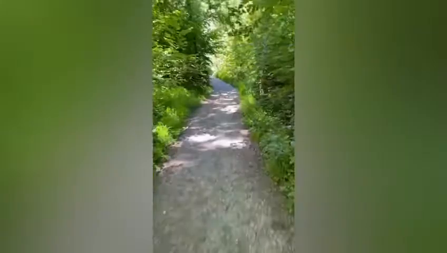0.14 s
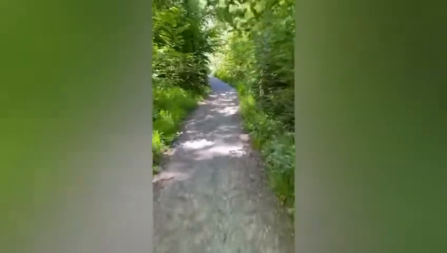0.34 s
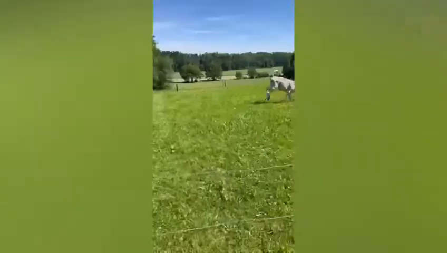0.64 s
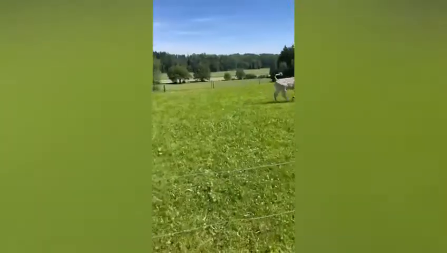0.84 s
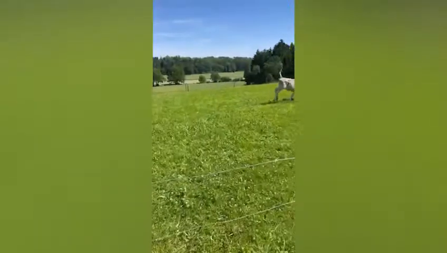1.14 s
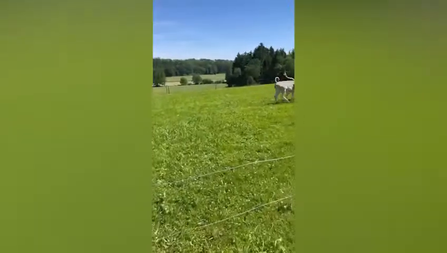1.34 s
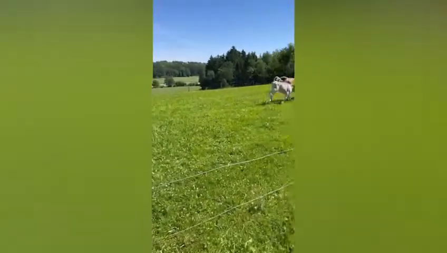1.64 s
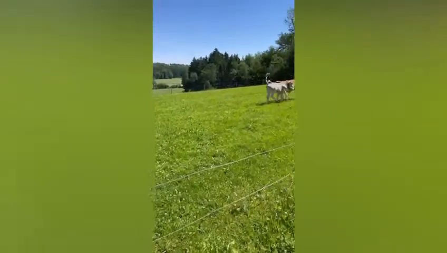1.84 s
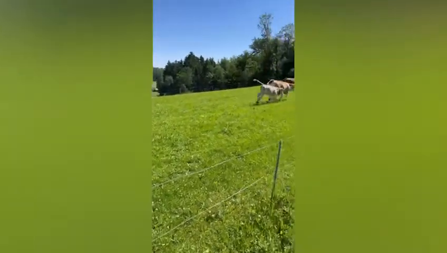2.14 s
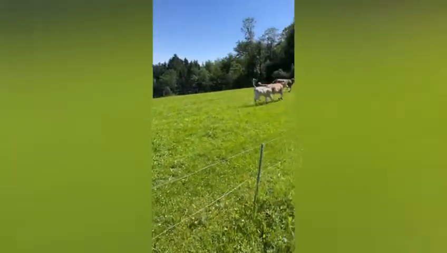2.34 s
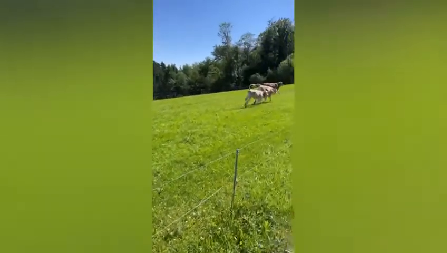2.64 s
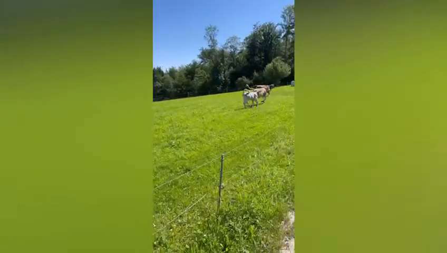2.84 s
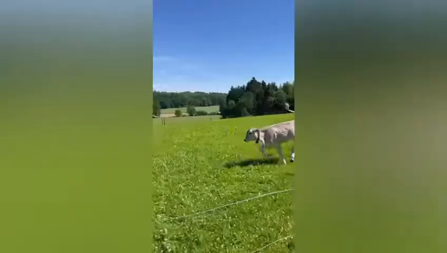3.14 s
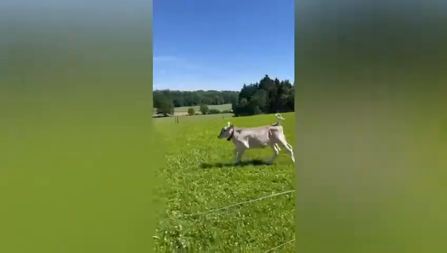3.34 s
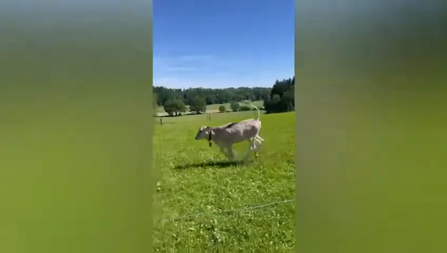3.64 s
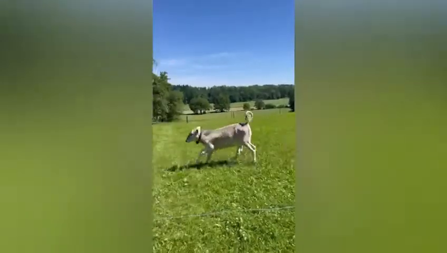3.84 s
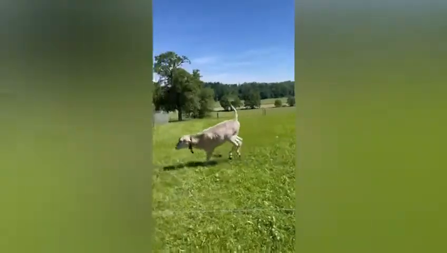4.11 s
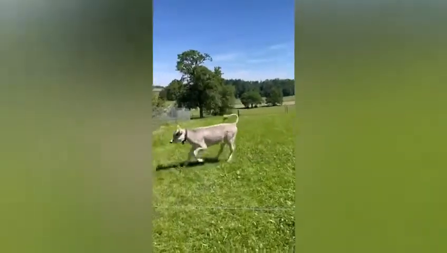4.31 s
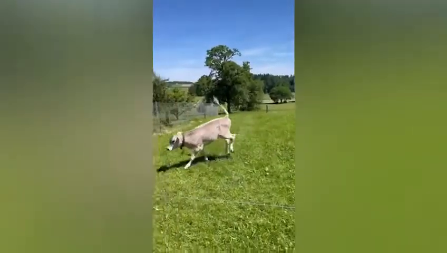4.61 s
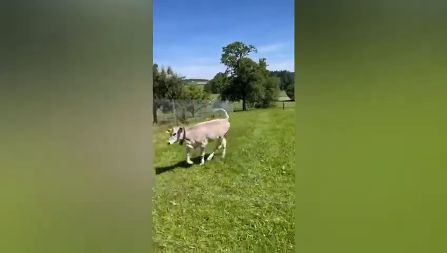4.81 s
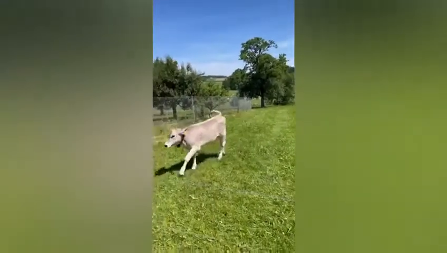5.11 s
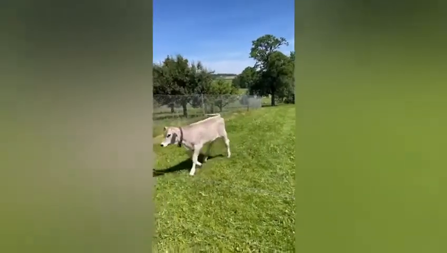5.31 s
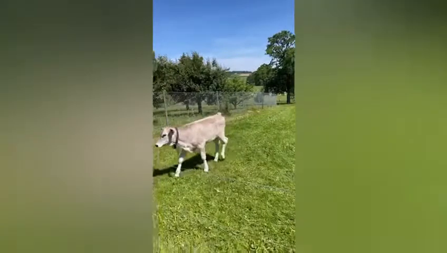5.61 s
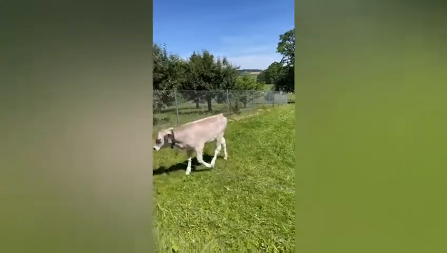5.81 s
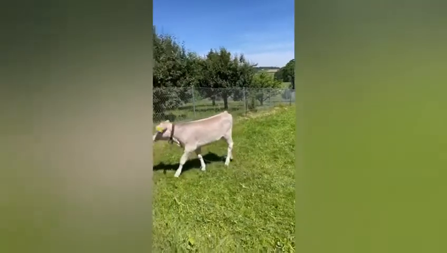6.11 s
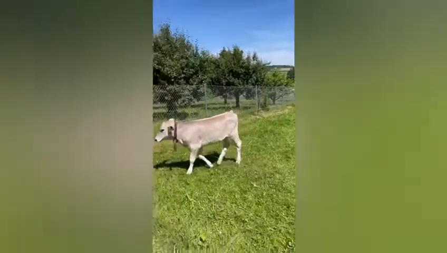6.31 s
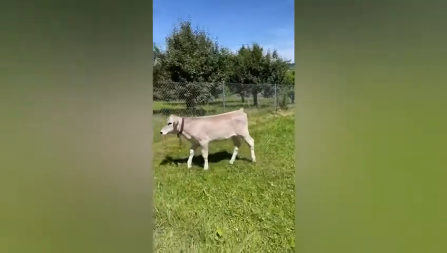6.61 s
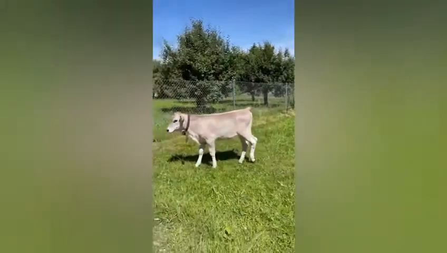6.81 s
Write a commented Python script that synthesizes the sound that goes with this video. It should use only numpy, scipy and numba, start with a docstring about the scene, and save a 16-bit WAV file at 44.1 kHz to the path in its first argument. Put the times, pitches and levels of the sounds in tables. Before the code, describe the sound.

A short rumble with clicking gravel gives way to a tinny cowbell rattling close by in a breezy pasture.

```python
"""A low rumble and clicking gravel on a forest path, then an abrupt change to an open pasture.
Close to the microphone a calf trots from right to left, a small sheet-metal bell on its collar.
The clapper bounces and chatters: each blow gives a short hollow note, singing shell tones and a jingle.
Far off an engine hums and small birds twitter; a breeze grows on the phone's microphone."""
import sys
import numpy as np
from scipy import signal
from scipy.fft import rfft, irfft
from scipy.io import wavfile
from scipy.ndimage import uniform_filter1d
from numba import njit

SR = 44100
rng = np.random.default_rng(int(sys.argv[2]) if len(sys.argv) > 2 else 0)


def store_wav(level_fs):
    """Save 16-bit WAV to argv[1]."""
    pcm = np.round(np.clip(np.atleast_2d(level_fs), -1, 1) * 32767)
    wavfile.write(sys.argv[1], SR, pcm.T.astype(np.int16))


N = 306936
TIME = np.arange(N) / SR
LEFT_RIGHT = np.array([[1], [-1]])


def undb(db):
    """Decibels to gain."""
    return 10 ** (np.asarray(db) / 20)


def unit(x):
    """Scale to rms 1."""
    return x / np.sqrt(np.mean(x ** 2))


def curve(rows, column=1):
    """One column of a table, joined by straight lines in time."""
    rows = np.array(rows)
    return np.interp(TIME, rows[:, 0], rows[:, column])


def over_hz(points):
    """A table of f/Hz and value, read at every spectral bin."""
    hz, value = np.transpose(points)
    return np.interp(np.log(np.fft.rfftfreq(N, 1 / SR) + 1), np.log(hz + 1), value)


def drift(rate):
    """Smooth random wander with a spread near 1."""
    hold = int(SR / rate)
    steps = np.repeat(rng.standard_normal(N // hold + 1), hold)
    return 1.3 * uniform_filter1d(uniform_filter1d(steps, hold), hold)[:N]


def band(x, lo_hz, hi_hz):
    """Gentle band-pass."""
    sos = signal.butter(2, [lo_hz, min(hi_hz, SR / 2 - 100)], "band", fs=SR, output="sos")
    return signal.sosfilt(sos, x + 1e-18)


def coloured(x, spectrum, share=1):
    """Shape a signal by a table of f/Hz and level/dB."""
    return irfft(rfft(x) * undb(over_hz(spectrum)) * share, N)


def air(spectrum, apart_hz):
    """Stereo noise, rms 1; the channels share the bass and part above apart_hz."""
    hz = np.fft.rfftfreq(N, 1 / SR)
    mid = coloured(rng.standard_normal(N), spectrum)
    side = coloured(rng.standard_normal(N), spectrum, share=hz / (hz + apart_hz))
    return unit(mid + side * LEFT_RIGHT)


def grains(rate, spread_db):
    """Random tiny impacts of uneven size, rms 1."""
    return unit((rng.random(N) < rate / SR) * rng.standard_normal(N) * undb(spread_db * rng.random(N)))


def bursts(rows, below, above):
    """One dying puff of noise a row, in a band round its centre frequency."""
    out, t = np.zeros(N + SR), TIME[:SR // 2]
    for start, db, hz, t60 in rows:
        puff = band(rng.standard_normal(len(t)) * undb(-60 * t / t60), hz / below, hz * above)
        i = int(start * SR)
        out[i:i + len(t)] += undb(db) * puff / np.abs(puff).max()
    return out[:N]


# rumble on the path: f/Hz, relative level/dB
PATH_RUMBLE = [(18, -27), (59, 1.5), (97, -13), (128, -0.5), (192, 2.5), (550, -17.5), (1110, -32),
               (1830, -26.5), (4080, -31.5), (4870, -43), (6100, -35.5), (7500, -38), (9000, -79),
               (11000, -31.5), (13000, -64)]
def forest_path():
    """A low rolling rumble and the crackle of fine grit."""
    rumble = undb(-36) * air(PATH_RUMBLE, apart_hz=1380) * undb(2.1 * drift(22.1))
    grit = band(grains(rate=260, spread_db=14), 1100, 3500)
    return rumble + undb(-39) * grit


# gravel near the microphone: t/s, peak level/dB, centre f/Hz, t60/s
STONES = [(.038, -35, 2430, .025), (.089, -33, 2200, 0.019), (.159, -35, 2670, 0.037),
          (.198, -37, 8700, 0.016), (.198, -31.5, 6430, .014), (.21, -25.5, 523, 0.088),
          (.222, -36, 1700, .06), (.331, -35, 3000, .015), (.363, -37, 1900, .015), (.424, -29, 2010, 0.02),
          (.435, -36, 2700, 0.051), (.455, -39, 2600, 0.035), (.525, -26.5, 630, 0.14),
          (.525, -27.5, 1890, 0.037)]
def stones():
    """Stones click as they are knocked on the path."""
    return bursts(STONES, below=1.33, above=1.22)


# open air over the pasture: f/Hz, relative level/dB
FIELD_AIR = [(100, 6), (300, -1.5), (400, -6.5), (700, -2.5), (1100, -7), (1800, -17), (2700, -39),
             (4000, -22), (6000, -36.5), (12000, -102)]
def pasture_hush():
    """A soft hush, a little stronger on the left."""
    level_db = curve([(.6, -49.5), (2.9, -51), (3.3, -49.5), (6.9, -44.5)]) + 0.92 * drift(3.3)
    return undb(level_db + LEFT_RIGHT) * air(FIELD_AIR, apart_hz=430)


# wind right on the microphone: t/s, level/dB
BREEZE = [(.55, -47), (2.1, -43.5), (2.95, -47.5), (3.35, -39), (4.8, -38.5), (5.6, -45), (6.05, -37.5),
          (6.4, -36.5), (6.66, -30.5), (6.76, -29.5), (6.95, -31.5)]
# its rumble: f/Hz, relative level/dB
WIND_RUMBLE = [(12, -57.5), (20, -40.5), (53, 1), (75, 1.5), (151, -7.5), (185, -13), (248, -20),
               (372, -37.5), (500, -27.5), (650, -82.5), (1100, -120)]
def breeze():
    """Moving air rumbles unevenly on the microphone."""
    return undb(curve(BREEZE) + 2 * drift(12)) * air(WIND_RUMBLE, apart_hz=1150)


# engine in the distance: t/s, firing f/Hz, level/dB
ENGINE = [(.55, 86, -64), (1.7, 86, -57), (2.05, 86, -52), (2.7, 86.5, -51), (3.1, 86, -54),
          (3.25, 86, -72)]
def far_engine():
    """Three firing harmonics, their phases jumbled by the long path through moving air."""
    phase = 2 * np.pi * np.cumsum(curve(ENGINE) * (1 + 0.0061 * drift(7.4))) / SR
    firing = sum(undb(db + 2 * drift(6.57)) * np.sin(harmonic * phase + 0.91 * drift(8.5))
                 for harmonic, db in enumerate([0, -2, -2], start=1))
    return undb(curve(ENGINE, column=2)) * firing


def taps(times, db):
    """A force of single impulses, one a blow."""
    return np.bincount(np.clip(np.round(times * SR).astype(int), 0, N - 1), undb(db), N)


def last_blow(times):
    """Index of the latest blow at every sample."""
    return np.maximum(np.searchsorted(times, TIME, "right") - 1, 0)


def bounces(times, db, t60):
    """After a blow the clapper bounces many times on the wall, ever more softly."""
    fade = signal.lfilter([1], [1, -undb(-60 / (t60 * SR))], taps(times, db) + 1e-18)
    return uniform_filter1d(fade, size=160) * grains(rate=2500, spread_db=9.9)


@njit
def mode(force, hz, t60, pitch):
    """One damped resonance whose frequency follows the pitch factor."""
    out, z, pole = np.empty(len(force)), 0j, 0j
    for i in range(len(force)):
        if i % 256 == 0:
            pole = np.exp((2j * np.pi * hz * pitch[i] - np.log(1000) / t60) / SR)
        z = z * pole + force[i] + 1e-18
        out[i] = z.imag
    return out


# the clapper rolls round the rim: t/s, length/s, low jingle drive/dB, top jingle drive/dB
RIM_ROLLS = [(0.747, 0.034, -19.5, -24), (0.903, 0.12, -31, -34), (1.557, 0.048, -27, -38),
             (2.04, 0.085, -27, -30.5), (2.502, 0.13, -29, -32.5), (3.24, 0.27, -29, -35.5),
             (3.692, 0.041, -22, -31), (3.808, 0.13, -35.5, -34.5), (4.416, 0.025, -17.5, -30),
             (4.47, 0.032, -39, -38), (5.063, 0.15, -29, -28)]
def chatter(column, trot_end_s=4.9, trot_db=-44.5, walk_db=-60.5, attack_s=0.029, release_db_per_s=234):
    """The loose clapper ticks, more at a trot than at a walk, and at times rolls round the rim."""
    level = undb(np.interp(TIME, [trot_end_s, trot_end_s + 0.023], [trot_db, walk_db]))
    for roll in RIM_ROLLS:
        start, length = roll[:2]
        attack = np.clip((TIME - start) / attack_s, 0, 1)
        level += attack * undb(roll[column] - release_db_per_s * np.clip(TIME - start - length, 0, 1))
    return level * undb(4.5 * drift(30)) * grains(rate=740, spread_db=1.5)


# modes of the hollow note; opposite signs make it swell for a few ms: f/Hz, level/dB, t60/s, weight
HOLLOW_MODES = [(1231.7, 4.5, 0.11, 0.82), (1269, 6.5, 0.021, -0.8), (1234.5, -15, 0.12, 0.95),
                (1020, -28.5, 0.46, 0.45)]
def hollow_note(times, db, rattle, pitch):
    """The bell's strongly damped main note, roughened by the bouncing clapper."""
    force = taps(times, db) + undb(-37.5) * rattle + undb(-36) * bounces(times, db, t60=.12)
    return sum(weight * undb(gain) * mode(force, float(hz), t60, pitch)
               for hz, gain, t60, weight in HOLLOW_MODES)


# hum, ring and upper ring of the shell: f/Hz, t60/s, rise/s, beat/Hz, beat depth 0-1
SHELL_TONES = [(2348, 1.3, .02, 3, .12), (3162, .7, .005, 17, .07), (4572, .4, .003, 9, .12)]
# upper ring against a blend of ring and jingle: t/s, level/dB
UPPER_RING = [(.65, -11), (.9, -6), (1.2, -13), (2.05, -19.5), (2.6, -6), (3.15, -11), (4.2, -16.5),
              (4.48, 3), (4.98, -6.5), (5.1, -3.5), (6.0, -0.5), (6.35, -3), (6.8, -12)]
def shell_tones(times, force_db, hum_db, ring_db, jingle_db, pitch, brake_t60=0.024, full_jolt_db=-21.5):
    """Long singing tones; each contact jolts their phase and pitch, and feeds or brakes them."""
    upper_db = np.interp(times, *np.transpose(UPPER_RING)) + 0.68 * ring_db + 0.32 * jingle_db
    hardness = np.minimum(undb(force_db - full_jolt_db), 1)
    last = last_blow(times)
    age = np.abs(TIME - times[last])
    brake_db = 60 * TIME / brake_t60  # the fastest a tone can fall
    out = 0
    for (hz, t60, rise, beat_hz, depth), db in zip(SHELL_TONES, (hum_db, ring_db, upper_db)):
        swing_db = np.maximum.accumulate(db[last] - 60 * age / t60 + brake_db) - brake_db
        swing = uniform_filter1d(undb(swing_db), size=int(rise * SR))
        jolt, detune = rng.standard_normal((len(times), 2)).T
        # the bell swings on its strap, so pitch and loudness waver
        tuning = 1 + 0.00139 * detune[last] + 0.001197 * drift(25)
        phase = 2 * np.pi * np.cumsum(hz * pitch * tuning) / SR
        phase += 1.46 * uniform_filter1d(np.cumsum(jolt * hardness)[last], size=400)
        rough = undb(-15) * (drift(90) * np.sin(phase) + drift(90) * np.cos(phase))
        tone = np.sin(phase) + depth * np.sin(phase - 2 * np.pi * beat_hz * TIME) + rough
        sway_db = 1.3 * drift(30) + 1.4 * drift(11)
        out += swing * undb(sway_db) * tone
    return out


def struck_modes(modes, times, db, rattle, pitch, spot_spread_db=3, waver=0.0033):
    """The clapper lands on another spot each time, so mode strengths vary; their pitches waver."""
    total = np.sqrt(sum(undb(gain) ** 2 for _, gain, _ in modes))
    out = 0
    for hz, gain, t60 in modes:
        force = taps(times, db + spot_spread_db * rng.standard_normal(len(times)))
        force += rattle * undb(5.6 * drift(12))
        out += undb(gain) / total * mode(force, float(hz), t60, pitch * (1 + waver * drift(45)))
    return out


# short-lived modes close to the ring: f/Hz, relative level/dB, t60/s
CLANK_MODES = [(3062, 0, .075), (3015, -9, .05), (3250, -14, .04)]
def clank(times, db, rattle, pitch):
    """A short clank, fed by blows, bounces and chatter."""
    contacts = undb(-30.5) * bounces(times, db, t60=0.044) + undb(-43) * rattle
    return band(struck_modes(CLANK_MODES, times, db - 12.5, contacts, pitch), 3070, 3190)


# high shell modes, lower and top group: f/Hz, relative level/dB, t60/s
LOW_JINGLE = [(4941, -11, .85), (5110, -15, .15), (5330, -18, .1), (5673, -18, .2), (5900, -17, .06),
              (6260, -16, .08), (6430, -14, .07), (6632, -4, .2), (6815, 0, .18), (6922, 1.5, .15),
              (7407, -15, .15), (7780, -16, .07), (8139, -3, .17), (8387, -3, .11), (8677, -7, .12)]
TOP_JINGLE = [(9517, -6, .1), (9819, -4, .11), (9926, -3, .11), (10190, 0, .11), (10430, 0, .14),
              (10798, 5, .2), (10870, 0, .15), (11345, 2, .3), (11584, 1, .16)]
def jingle(times, low_db, top_db, low_contacts, top_contacts, pitch):
    """The thin shell rings brightly under blows and small contacts."""
    low = struck_modes(LOW_JINGLE, times, low_db - 8.5, low_contacts, pitch)
    top = struck_modes(TOP_JINGLE, times, top_db - 9, top_contacts, pitch)
    return band(low, 5850, 14200) + band(top, 9800, 10640)


# metal landing on metal: f/Hz, relative level/dB
SNAP_COLOUR = [(900, -8.5), (1700, -4), (2700, 5), (4000, -5.5), (5600, -4.5), (7000, 0.5), (7800, -13),
               (9200, 5), (10500, 9), (12000, 2.5)]
# bands whose strength differs from blow to blow: low f/Hz, high f/Hz
SNAP_BANDS = [(700, 2500), (2500, 4800), (4800, 7500), (7500, 12500)]
def snap(times, db, rise_s=0.0014, spread_db=3.5):
    """A dry crack as the clapper lands, then a stuttering tinny clatter."""
    fade = 0
    for gain_db, t60 in ((18.5, .022), (17, .08)):  # crack, clatter
        decay = undb(-60 / (t60 * SR))
        fade += signal.lfilter([np.sqrt(1 - decay ** 2)], [1, -decay], taps(times, db + gain_db) + 1e-18)
    rise = np.exp(-1 / (rise_s * SR))
    envelope = signal.lfilter([1 - rise], [1, -rise], fade)
    noise = coloured(rng.standard_normal(N), SNAP_COLOUR)
    band_gains = undb(spread_db * rng.standard_normal((len(times), len(SNAP_BANDS)))).T
    last = last_blow(times)
    crack = sum(band(noise, lo, hi) * gain[last] for (lo, hi), gain in zip(SNAP_BANDS, band_gains))
    stutter = undb(3 * drift(140))
    return envelope * stutter * crack


# colour of the bell's dense weak modes: f/Hz, relative level/dB
SHIMMER = [(1000, -20), (1800, -15), (2700, -13), (3700, -37), (4700, 3), (5400, -18), (6300, -28),
           (7700, -42), (8300, 10), (9100, -24), (9900, 15.5), (11500, 4.5), (12300, -25)]
def shimmer(force, t60=0.14, rise_s=0.004, count=52):
    """Many weak modes, unevenly spaced, turn every tick into a short metallic tinkle."""
    t = TIME[:SR // 3]
    place, size, start = rng.random((count, 3)).T[:, :, None]
    hz = 1400 + 10600 * (np.arange(count)[:, None] + place) / count
    tones = np.sum((.5 + size) * np.sin(2 * np.pi * (hz * t + start)), axis=0)
    tail = tones * undb(-60 * t / t60) * (1 - np.exp(-t / rise_s))
    wash = signal.fftconvolve(force, tail / np.sqrt(2 * np.sum(tail ** 2)))[:N]
    return coloured(wash, SHIMMER)


def scatter(x, t60):
    """Diffuse echo from grass and trees, different in each channel."""
    t = TIME[:SR]
    tail = rng.standard_normal((2, SR)) * undb(-60 * t / t60) * (1 - np.exp(-t / 0.00098))
    return signal.fftconvolve(x[None], tail / np.sqrt(np.sum(tail[0] ** 2)), axes=1)[:, :N]


# phase between the microphone ports: f/Hz, lead of the left port/rad
PORT_PHASE = [(100, 0), (1200, -.2), (2350, .45), (3165, .7), (4575, 1.8), (4940, 3.9), (5500, 6.1),
              (6900, 7.3), (8300, 9), (10250, 10.35), (10800, 10.9), (11400, 12.2), (12000, 12.5)]
def at_microphone(bell):
    """The bell reaches the two ports slightly out of step, with a faint echo from the pasture."""
    left_db = over_hz([(1200, 0.046), (2350, 0.48), (3150, -0.87), (4570, -1.1), (6500, -0.006)])
    left = np.exp(.5j * over_hz(PORT_PHASE)) * undb(left_db)
    direct = irfft(rfft(bell) * np.array([left, 1 / left]), N)
    return direct + undb(-15.5) * scatter(bell.mean(axis=0), t60=0.31)


# clapper blows; the spot struck decides how hard each voice is driven:
# t/s, hollow note/dB, hum/dB, ring/dB, low jingle/dB, top jingle/dB, snap/dB
BLOWS = [(0.582, -44, -66, -61, -39, -25, -28.5), (0.615, -11, -49, -35.5, -31, -26.5, -32),
         (0.643, -22, -46.5, -30.5, -28, -27, -44), (0.733, -12.5, -55, -28.5, -16.5, -17, -29),
         (0.763, -26.5, -34.5, -45, -17, -10.5, -40), (0.823, -42, -37.5, -48, -33, -23, -55),
         (0.908, -28, -37, -32, -18.5, -10.5, -26), (0.939, -31.5, -36, -36.5, -23, -30, -53),
         (1.03, -36, -40, -44.5, -23, -25.5, -70.0), (1.101, -56, -42, -51, -26.5, -23, -48),
         (1.178, -45.5, -52, -61, -23.5, -15.5, -23), (1.196, -13, -42, -40.5, -42, -50, -65),
         (1.222, -22.5, -47, -39.5, -47.0, -25.5, -68), (1.284, -31.5, -53, -44, -34, -31, -70),
         (1.407, -23, -40.5, -26.5, -29, -16, -36.5), (1.551, -43, -66, -49, -25.5, -22, -41),
         (1.61, -18, -53, -36.5, -27.5, -22, -36), (1.661, -31.5, -71, -37.5, -37, -26, -50),
         (1.759, -38.5, -62, -49, -49, -46, -54), (1.816, -34, -58, -53, -40.5, -46, -58),
         (1.853, -35.5, -47.5, -43, -22.5, -17.5, -38), (1.973, -20.5, -55.5, -56, -35, -25.5, -43),
         (2.02, -20, -62, -20, -23, -18, -36), (2.079, -42.5, -57.0, -34.5, -20, -41, -51),
         (2.133, -12.5, -31.5, -27.5, -27, -15, -47), (2.201, -27.5, -65, -25, -36.5, -53, -51),
         (2.346, -20.5, -66, -41, -32.0, -43, -32.5), (2.377, -33, -63, -32.5, -27.5, -18.5, -43),
         (2.453, -27.0, -55, -38.5, -35.5, -34, -45), (2.536, -24, -49, -49, -30, -32.5, -47),
         (2.61, -22, -45.5, -34.5, -40, -38, -70.0), (2.823, -27.5, -57, -38.5, -68, -35, -43.5),
         (2.902, -36.5, -69, -49, -47.5, -40, -55), (3.067, -38, -62, -52, -42, -27, -46),
         (3.121, -23.5, -54, -20, -23, -16, -32), (3.152, -36, -54, -34.5, -51, -47, -66),
         (3.2, -29.5, -66.0, -36.5, -32, -29, -48), (3.241, -26, -48.5, -45.5, -19, -21, -28),
         (3.367, -35, -42.5, -34, -27, -21, -42), (3.404, -28, -43, -48, -31, -15.5, -45),
         (3.466, -10, -30.5, -38, -35, -18, -22.5), (3.497, -24.5, -42, -31, -52, -40, -72),
         (3.582, -32, -39, -49.0, -38, -24, -71), (3.707, -24.5, -34.5, -49, -30, -28, -42),
         (3.758, -64, -34, -49, -25, -14.5, -37), (3.875, -38, -42, -51, -45, -39, -52),
         (3.944, -33, -45, -59, -30, -19, -42), (4.01, -11.5, -41, -33, -30, -18, -31),
         (4.06, -8.5, -43, -34.5, -35, -22.5, -45), (4.141, -16, -34.5, -33.5, -42, -27, -37),
         (4.236, -20.5, -34.5, -42, -33, -25, -38), (4.357, -29, -57, -42, -22, -15, -27),
         (4.383, -33.5, -51, -45, -34, -33, -50), (4.432, -43, -62, -63, -27, -29, -48),
         (4.471, -17.5, -47, -30, -33, -15, -37), (4.581, -21.5, -44, -31, -28, -20, -40),
         (4.855, -8.5, -35.5, -35, -25, -16.5, -27.5), (4.953, -37, -53, -48, -21, -17, -44),
         (4.969, -19, -51, -28.5, -21.5, -13.5, -42), (5.035, -26, -48.5, -42, -15, -10.5, -28),
         (5.121, -23, -38, -40, -39, -28, -40), (5.179, -26, -45.5, -49, -37, -30, -70.0),
         (5.284, -40, -60, -48.5, -50, -34, -65), (5.363, -34.5, -95.5, -60.5, -60, -51.0, -63),
         (5.473, -34.5, -99.0, -53, -66, -63, -80), (5.57, -21.5, -73, -38, -60, -44, -42),
         (5.605, -44, -70, -53.5, -47.5, -48, -47), (5.917, -49, -86, -75, -56, -53, -37),
         (5.977, -22, -44.5, -34.5, -37, -31, -25), (6.02, -25, -73, -44, -42, -40, -56),
         (6.053, -31, -60, -54.5, -36.5, -34, -61), (6.343, -18, -46.5, -33.5, -32.5, -30, -49),
         (6.441, -17, -46.5, -41.5, -39, -27.5, -31), (6.492, -32, -56, -60, -46, -47, -60),
         (6.539, -29, -48, -47.5, -33.5, -24, -42), (6.721, -14.5, -61, -29, -19.5, -11.5, -30),
         (6.781, -16, -46.0, -33, -32, -17, -44.0), (6.826, -23, -62, -37, -31.5, -38, -70.0),
         (6.859, -27.5, -52, -43, -42, -36, -56), (6.894, -31, -57, -50, -42.5, -54, -70.0)]
# the calf first runs away from the microphone, then comes closer: t/s, pitch factor
DOPPLER = [(0, .9925), (3.0, .9925), (3.2, .999), (6.9, 1.0005)]
# it crosses from right to left: t/s, left minus right level of the bell's lower voices/dB
CROSSING = [(.6, -1.5), (1.8, -0.5), (2.6, -0.8), (3.4, 1), (4.2, 2), (5.2, 1), (6.4, 3.5)]
def cowbell():
    """The collar bell, close by: one clapper drives all the voices of the sheet-metal shell."""
    times, hollow_db, hum_db, ring_db, low_db, top_db, snap_db = np.transpose(sorted(BLOWS))
    pitch = curve(DOPPLER)
    low_rattle, rattle = chatter(column=2), chatter(column=3)
    low_buzz, top_buzz = bounces(times, low_db, t60=0.03), bounces(times, top_db, t60=0.02)
    low_contacts = undb(-39) * low_rattle + undb(-24) * low_buzz
    top_contacts = undb(-39) * rattle + undb(-27) * top_buzz
    ticks = taps(times, snap_db - 1) + undb(-9.5) * rattle
    ticks += undb(-0.5) * top_buzz + undb(-10.5) * low_buzz
    body = hollow_note(times, hollow_db, rattle, pitch)
    body += undb(-1.5) * shell_tones(times, hollow_db, hum_db, ring_db, (low_db + top_db) / 2, pitch)
    treble = clank(times, (hollow_db + ring_db) / 2, rattle, pitch)
    treble += jingle(times, low_db, top_db, low_contacts, top_contacts, pitch)
    treble += snap(times, snap_db) + shimmer(ticks)
    pan = undb(curve(CROSSING) * LEFT_RIGHT / 2)
    return at_microphone(band(body * pan + treble, 690, 10900))  # so small a bell radiates no bass


# birds off in the wood: t/s, length/s, first f/Hz, last f/Hz, relative level/dB, trill depth/share of f
SYLLABLES = [(1.12, .018, 3580, 4400, -43, 0), (1.156, .018, 4700, 4030, -40, 0),
             (1.161, 0.021, 3950, 4400, -48, 0.016), (1.188, 0.04, 3290, 4550, -43, 0.02),
             (1.207, 0.016, 4330, 3300, -40.5, 0.009), (1.267, 0.092, 3990, 3760, -39.5, 0.1),
             (1.384, 0.028, 3200, 4120, -44, 0.049), (2.53, 0.054, 3800, 3550, -41.5, 0.041),
             (2.782, 0.18, 3640, 3840, -42.5, 0.089), (2.971, 0.07, 3640, 3880, -40.5, 0.015),
             (3.008, 0.046, 3620, 3250, -39, 0), (4.62, .09, 3860, 3570, -44, 0.14)]
def birds(trill_hz=99):
    """Quick clear glides and buzzy trills, smeared by the trees."""
    song = np.zeros(N)
    for start, length, first_hz, last_hz, db, depth in SYLLABLES:
        i, count = int(start * SR), int(length * SR)
        trill = 1 + depth * np.sin(2 * np.pi * trill_hz * TIME[:count])
        hz = np.linspace(first_hz, last_hz, count) * trill
        song[i:i + count] += undb(db) * np.hanning(count) * np.sin(2 * np.pi * np.cumsum(hz) / SR)
    return undb(-8) * song + undb(-3) * scatter(song, t60=.45)


# gusts straight onto the microphone: t/s, relative level/dB, centre f/Hz, t60/s
GUSTS = [(6.115, -27, 78.4, 0.2), (6.32, -21.5, 84, 0.29), (6.39, -22, 65, 0.58), (6.565, -18, 84, 0.18),
         (6.632, -15.5, 85.5, 0.16), (6.665, -17.5, 80, 0.13), (6.702, -21, 141, 0.07),
         (6.851, -14, 109, 0.028), (6.908, -10.5, 57.4, .18)]
def buffets():
    """Separate low thumps of air as the breeze rises."""
    return band(bursts(GUSTS, below=1.34, above=1.25), 30, 230)


def scene(path_end_s=.538):
    """The forest path gives way abruptly to the pasture."""
    path = forest_path() + stones()
    pasture = pasture_hush() + breeze() + far_engine() + buffets() + birds() + cowbell()
    in_pasture = np.clip((TIME - path_end_s) / 0.0024, 0, 1)
    return (1 - in_pasture) * path + in_pasture * pasture


def record(dry, top_hz=12000):
    """The phone cuts the top treble steeply."""
    return signal.sosfilt(signal.ellip(8, .2, 70, top_hz, fs=SR, output="sos"), dry)


dry = scene()
out = record(dry)
store_wav(out)
```